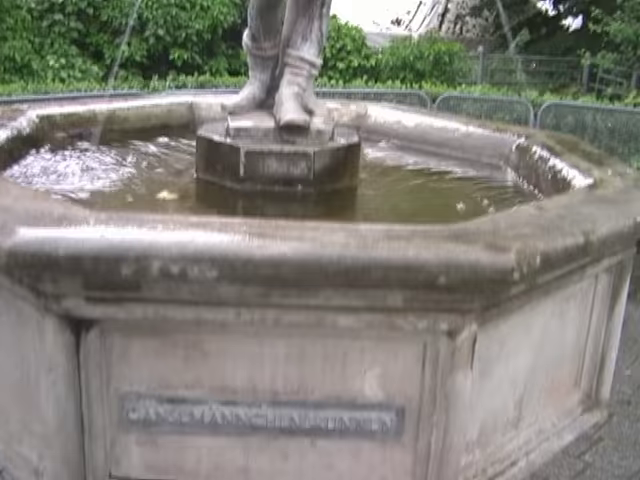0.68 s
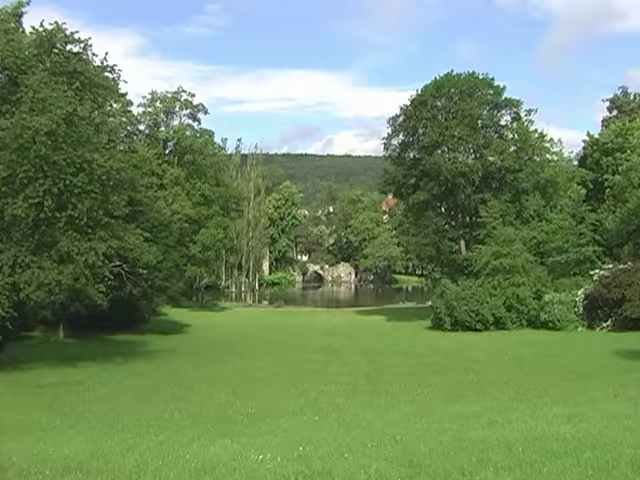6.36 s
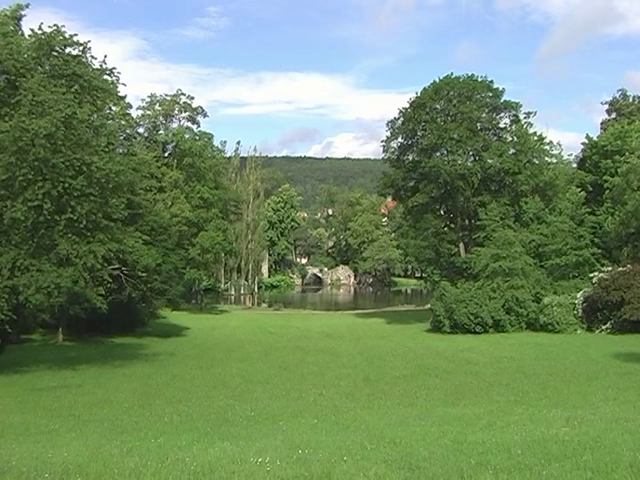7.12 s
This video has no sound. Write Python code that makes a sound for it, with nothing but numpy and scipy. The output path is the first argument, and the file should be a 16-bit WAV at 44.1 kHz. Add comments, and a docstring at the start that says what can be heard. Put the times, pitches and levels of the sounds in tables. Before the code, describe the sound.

Outdoors, close to a fountain basin, fine jets make crisp ticks, ringing bubble plinks and a few low glugs over a continuous rush. Early on a car comes by, its low engine and pulsing drone giving way to broad tyre noise, then recedes. A sudden cut leads to an open park, very soft, with far-off rushing, thin high bird notes and repeated chips turning into buzzes, with short woodland echo. Handheld stereo microphone.

```python
"""After a short silence, thin jets patter into the basin of a stone fountain: noise for the steady rush,
ringing tones and bursts of noise for the drops. A car passes behind: tyre noise, exhaust drone, engine tone.
Then a hard cut to a quiet park with far rushing, made of noise. A thin high warbler starts, then a finch
joins it: gliding sines that warble or buzz, with echoes from the trees as a dying tail of noise."""
import sys
import numpy as np
from scipy import signal
from scipy.io import wavfile

SR = 44100
rng = np.random.default_rng(int(sys.argv[2]) if len(sys.argv) > 2 else 0)


def persist_wave(psi):
    """Save psi, clipped to +-1, as 16-bit WAV."""
    counts = np.round(np.clip(psi, -1, 1) * 32767).astype(np.int16)
    wavfile.write(sys.argv[1], SR, np.atleast_2d(counts).T)


def invert_db(level):
    """Linear amplitude ratio for a level in decibels (20 dB per decade), elementwise."""
    return 10 ** (np.asarray(level, dtype=float) / 20)


N = 357210

# stay at the fountain: (first moment [s], last moment [s])
FOUNTAIN_S = (.7575, 6.438)


def rms_one(x):
    """Scales a signal to unit power."""
    return x / np.sqrt(np.mean(x ** 2) + 1e-20)


def in_time(rows):
    """Turns table rows into one curve per column, sample by sample."""
    s, *columns = np.transpose(rows)
    return [np.interp(np.arange(N) / SR, s, c) for c in columns]


def at_hz(points, hz):
    """Reads a table at a frequency, along a logarithmic frequency axis."""
    points = np.array(points)
    return np.interp(np.log(hz), np.log(points[:, 0]), points[:, 1])


def sides(left_right_db):
    """Gains of the two channels for a left-right level difference."""
    return invert_db(np.multiply.outer([.5, -.5], left_right_db))


def drift(rate_hz):
    """Slow random curve of unit power: noise smoothed by two equal poles, computed every 40 samples."""
    r = np.exp(-2 * np.pi * rate_hz * 40 / SR)
    white = rng.standard_normal(N // 40 + 2002)
    slow = signal.lfilter([1], [1, -2 * r, r * r], white)[2000:]   # skip the start-up
    return np.interp(np.arange(N) / 40, np.arange(len(slow)), rms_one(slow))


def bandpass(low_high_hz, x):
    """Keeps only the sound between two frequencies."""
    return signal.sosfilt(signal.butter(2, low_high_hz, "band", fs=SR, output="sos"), x)


def banded_noise(spectrum, likeness, balance, patchy_db, shape_db=lambda hz: 0):
    """Third-octave bands of stereo noise, each with its own level, flicker and left-right likeness."""
    out, power = 0, 0
    edges = 28 * 2 ** (np.arange(28) / 3)
    white = rng.standard_normal((2, 2, N))
    for k, (low, high) in enumerate(zip(edges, edges[1:])):
        mid, side = bandpass([low, high], white[k % 2])   # neighbours use separate noise
        hz = np.sqrt(low * high)
        alike = np.clip(at_hz(likeness, hz), -1, 1)
        gain = invert_db(at_hz(spectrum, hz))
        power += gain ** 2 * (high - low) * 4 / SR
        flicker = invert_db(patchy_db * drift(6.0) + shape_db(hz))
        gain = gain * flicker * sides(at_hz(balance, hz))[:, None]
        out = out + gain * (np.sqrt(1 + alike) * mid + np.sqrt(1 - alike) * side * [[1], [-1]])
    return out / np.sqrt(power)


def scatter(s, shapes):
    """Adds each stereo shape (2, events, samples) at its moment."""
    start = np.round(s * SR).astype(int)[:, None]
    at = np.minimum(start + np.arange(shapes.shape[2]), N).ravel()
    return np.array([np.bincount(at, side.ravel(), N + 1)[:N] for side in shapes])


def bubbles(s, db, hz, pan_db, lag_s, cycles, rise, size):
    """Each bubble swells within a cycle, rings some cycles and climbs in pitch as it nears the surface."""
    late_s = np.multiply.outer([0, 1], lag_s)[..., None] - np.minimum(lag_s, 0)[:, None]
    turns = np.maximum(np.arange(size) / SR - late_s, 0) * hz[:, None]
    swell_and_decay = (1 - np.exp(-turns / 0.4)) * np.exp(-turns / cycles[:, None])
    shape = swell_and_decay * np.sin(2 * np.pi * turns * (1 + rise * turns))
    return scatter(s, 1.5 * shape * (invert_db(db) * sides(pan_db))[..., None])


# bands of an impact: (from [Hz], to [Hz])
CRACK_BANDS_HZ = [(2800, 6500), (5000, 9500), (8000, 12500)]
# greatest share of an impact in each of these bands: (level [dB])
CRACK_BANDS_DB = [1, -1, -4.5]
CRACK_COLOUR_DB = 6.0   # how unevenly an impact fills the bands


def cracks(s, db, pan_db, decay_s):
    """A drop hits the surface: a bright noise burst with its own colour, mostly alike in both channels."""
    noise = rng.standard_normal((len(s), 3, 128)).transpose(1, 0, 2)
    decay = np.exp(-np.arange(128) / SR / decay_s)
    burst = (noise[0] + 0.73 * noise[1:]) * decay * sides(pan_db)[..., None]
    colour_db = CRACK_COLOUR_DB * rng.standard_normal((len(s), 3))
    colour_db = colour_db - colour_db.max(axis=1, keepdims=True) + CRACK_BANDS_DB
    out = 0
    for band, share_db in zip(CRACK_BANDS_HZ, colour_db.T):
        out = out + bandpass(band, scatter(s, burst * invert_db(db + share_db)[:, None]))
    return out


# loudest drops: (time [s], bubble level [dB], bubble pitch [Hz], impact level [dB])
DROPS = [(0.765, -27, 3500, -25.5), (0.821, -20, 3020, -28), (0.903, -31, 3700, -24),
         (0.9717, -16, 3470, -27), (1.1237, -22, 3600, -23), (1.1768, -22, 7960, -28),
         (1.2066, -28, 2930, -26), (1.224, -18, 3830, -19), (1.267, -22, 3200, -24),
         (1.357, -22, 3580, -31), (1.4067, -19.5, 3550, -24), (1.4686, -34, 2905, -22),
         (1.526, -21.5, 3320, -33), (1.622, -27, 3740, -28), (1.714, -19, 3710, -24.5),
         (1.9312, -16, 3500, -27), (2.1055, -13.5, 4200, -25), (2.1288, -20.5, 4240, -34),
         (2.1602, -17, 3720, -33), (2.352, -24.5, 3730, -29), (2.417, -17, 3740, -30),
         (2.607, -21.5, 3720, -24), (2.645, -15, 5160, -32), (2.6608, -8, 3786, -27.5),
         (2.69, -15, 3640, -32), (2.971, -13.5, 3140, -24), (3.027, -30, 6200, -32),
         (3.095, -15.5, 5840, -22), (3.3789, -17, 2800, -31), (3.5325, -9.5, 5300, -35),
         (3.6202, -12, 3200, -37), (3.8757, -18, 3030, -36), (4.0346, -16, 3950, -36),
         (4.219, -14, 5600, -27), (4.2404, -21, 4400, -27), (4.2875, -15, 4680, -34),
         (4.476, -19.5, 3870, -30), (4.5196, -17.5, 3060, -20), (4.566, -18, 4700, -26),
         (4.633, -18, 3840, -39), (4.763, -20.5, 3750, -38), (4.867, -33, 4000, -23),
         (5.0442, -16, 5430, -35), (5.084, -21.5, 5600, -27), (5.116, -21.5, 3870, -32),
         (5.1994, -19.5, 3840, -38), (5.218, -35, 3420, -16), (5.303, -27, 5280, -31),
         (5.493, -15.5, 4200, -28), (5.545, -19, 4670, -45), (5.6324, -18.5, 4620, -41),
         (5.6788, -24, 3770, -36), (5.743, -18, 5440, -42), (5.772, -17, 6360, -35),
         (5.9078, -23, 2800, -20), (6.033, -14.5, 4240, -40), (6.089, -19.5, 5680, -32),
         (6.098, -21, 4360, -27), (6.1633, -16.5, 5340, -32), (6.21, -22, 4380, -22),
         (6.2658, -21, 5250, -30), (6.298, -19, 5270, -35), (6.3462, -28, 3840, -26),
         (6.4255, -20, 5660, -29)]
DROPS_LEFT_DB, DROPS_SPREAD_DB = 1.3, 4   # where they land: mean and range of left-right level


def loudest_drops():
    """Each loud drop cracks on the surface and traps a bubble that rings for two or three cycles."""
    s, db, hz, crack_db = np.transpose(DROPS)
    lag, ring, place = rng.random((len(s), 3)).T
    pan_db = DROPS_LEFT_DB + DROPS_SPREAD_DB * (place - .5)
    rings = bubbles(s, db, hz, pan_db, 4e-5 * (lag - .3), 2.0 + 1.0 * ring, rise=0.0044, size=640)
    return rings + cracks(s, crack_db, pan_db, decay_s=0.0016)


# left-right likeness near by: (frequency [Hz], likeness [-1 to 1])
NEAR_LIKENESS = [(60, 1), (300, 0.99), (1360, 0.98), (3000, .9), (6500, 0.45), (10000, 0.22), (14000, 0.33)]
# left-right balance near by: (frequency [Hz], left over right [dB])
NEAR_BALANCE = [(60, 4), (110, 1), (200, 2.5), (370, 1.5), (680, 2), (1250, 3), (2290, 1.5), (4200, 3),
                (7700, -3), (14100, 5)]
# colour of the patter: (frequency [Hz], relative level per Hz [dB])
PATTER = [(1500, 7), (2500, -7), (4000, -2), (6000, -4.5), (9000, -21), (13500, -31.5)]
# strength of the patter above 6 kHz as the jets waver: (time [s], level [dB])
SPRAY = [(.75, -47.5), (1.3, -46.5), (2, -45.5), (2.6, -47), (3.1, -44), (3.7, -44), (4.3, -47.5),
         (5, -47.5), (5.7, -46), (6.44, -47.5)]


def patter(count):
    """Countless small drops, coming in clumps, most faint and a few loud; each rings, one in five cracks."""
    first, last = (np.array(FOUNTAIN_S) * SR).astype(int)
    density = np.cumsum(invert_db(3.5 * drift(30))[first:last])
    when, pitch, size, pan, lag, ring, force = rng.random((count, 7)).T
    s = (first + np.searchsorted(density, when * density[-1])) / SR
    hz = 1600 * 8.4 ** pitch
    db = at_hz(PATTER, hz) + 20 * np.log10(hz) - 4 * np.log(np.maximum(size, .01))
    pan_db = at_hz(NEAR_BALANCE, hz) + 3 * (pan - .5)
    rings = bubbles(s, db, hz, pan_db, 6e-5 * (lag - .5), 1.5 + 4.5 * ring, rise=.002, size=256)
    tick_db = -4.5 * np.log(np.maximum(force[::5], .02))
    ticks = cracks(s[::5], tick_db, pan_db[::5], decay_s=0.00067)
    drops = rms_one(rings) + invert_db(-7.5) * rms_one(ticks)
    highpass = signal.butter(4, 6000, "high", fs=SR, output="sos")
    treble = signal.sosfilt(highpass, drops[:, first:last])
    return invert_db(in_time(SPRAY)[0]) * drops / treble.std()


# low tones: bubbles, and a short low plop at 2.97 s that may be the engine:
# (time [s], level [dB], pitch [Hz])
LOW_TONES = [(1.194, -29, 457), (2.974, -28, 249), (3.548, -21.5, 483), (4.609, -24.5, 534),
             (4.652, -26, 657), (4.96, -30, 672), (5.082, -27, 706), (5.365, -29, 490), (5.505, -32, 657),
             (5.582, -29, 720), (5.684, -33, 460), (5.748, -31, 703), (5.812, -25.5, 660),
             (6.149, -34, 634)]


def low_tones():
    """Low tones that swell, ring and climb as bubbles do, a little to the left; one may be the engine."""
    s, db, hz = np.transpose(LOW_TONES)
    steady = np.ones(len(s))
    return bubbles(s, db, hz, 2.6 * steady, 0 * steady, 5.5 * steady, rise=.006, size=3200)


def glugs(count):
    """Many fainter big bubbles under the jets ring at random moments."""
    when, pitch, size = rng.random((count, 3)).T
    s = np.interp(when, [0, 1], FOUNTAIN_S)
    steady = np.ones(count)
    hz = 420 * 3.5 ** pitch
    return bubbles(s, -31 - 8 * size, hz, 3.8 * steady, 0 * steady, 6 * steady, rise=0.0035, size=2400)


# colour of the jets' rush: (frequency [Hz], relative level per Hz [dB])
RUSH = [(25, -10), (60, -3.5), (150, -12), (280, 9), (500, -13), (1000, -4), (1600, 3.5), (2500, -2),
        (4000, -22), (6500, -44), (10000, -23), (14000, -42)]
RUSH_DB = -38.5   # rms level


def jet_rush():
    """The jets blur into a steady noise."""
    return invert_db(RUSH_DB) * banded_noise(RUSH, NEAR_LIKENESS, NEAR_BALANCE, patchy_db=0.0)


def fountain():
    """The basin: steady rush, random patter and glugs, the loudest drops, and the low tones."""
    return jet_rush() + patter(count=9000) + loudest_drops() + low_tones() + glugs(count=160)


# colour of the tyre roar: (frequency [Hz], relative level per Hz [dB])
TYRES = [(25, -26), (60, -9.5), (165, -5.5), (250, 0), (330, 5.5), (400, -1), (520, 1.5), (800, 1),
         (1200, 0), (1700, -1), (2900, -8.5), (5000, -13), (8000, -28), (14000, -31.5)]
# moment [s] and level [dB] when nearest; time [s] to cover the nearest distance, coming and going
PASS_S, PASS_DB, COMING_S, GOING_S = 2.87, -24, 0.77, 1
# the open view of the tyres comes later: moment and half width [s], added tilt and tread hiss
IN_VIEW_S, IN_VIEW_HALF_S, BRIGHTEN_DB_PER_OCTAVE, TREAD_DB = 3.85, 0.66, 1.14, 7.5
HIDDEN_DB_PER_OCTAVE, HIDDEN_TREAD_DB = -0.25, -3.5   # tilt and tread hiss out of view
TREAD_HZ, TREAD_OCTAVES = 2800, 1   # centre and half width of the tread hiss


def tyres(t):
    """Tyre roar falls off with distance on a straight road, and brightens in open view."""
    distance = np.hypot(1, (t - PASS_S) / np.where(t < PASS_S, COMING_S, GOING_S))
    view = np.exp(-((t - IN_VIEW_S) / IN_VIEW_HALF_S) ** 2)
    tilt_db = HIDDEN_DB_PER_OCTAVE + BRIGHTEN_DB_PER_OCTAVE * view ** 0.28
    tread_db = HIDDEN_TREAD_DB + TREAD_DB * view

    def brighten(hz):
        """Level change of a band through time: tilt around 800 Hz plus a hump of tread hiss."""
        hump = np.exp(-(np.log2(hz / TREAD_HZ) / TREAD_OCTAVES) ** 2)
        return tilt_db * np.clip(np.log2(hz / 800), -2, 4) + tread_db * hump

    roar = banded_noise(TYRES, NEAR_LIKENESS, NEAR_BALANCE, patchy_db=.8, shape_db=brighten)
    return invert_db(PASS_DB) / distance * roar


# exhaust drone at the top of its throbs: (time [s], level [dB])
BOOM = [(.75, -44), (1.45, -38), (1.6, -33), (2.25, -31), (2.55, -32.5), (2.7, -52), (3.2, -70)]
BOOM_HZ, SWAY_HZ = 319, 13   # mean pitch and its sway
THROB_S, THROB_TOP_S, THROB_DB = .2, 2.01, 4.5   # period, moment of a top, half the range


def exhaust(t):
    """A drone that throbs, its pitch swaying with every throb."""
    turn = 2 * np.pi * (t - THROB_TOP_S) / THROB_S
    hz = BOOM_HZ + SWAY_HZ * np.cos(turn) + 2.8 * drift(7.3)
    phase = 2 * np.pi * np.cumsum(hz) / SR
    db = in_time(BOOM)[0] + THROB_DB * (np.cos(turn) - 1) + 1.5 * drift(14)
    return np.sqrt(2) * invert_db(db) * np.sin(phase)


# pulls on the throttle: (time [s], length [s], from firing rate [Hz], to firing rate [Hz], level [dB])
ENGINE = [(.7, 0.85, 43.5, 45.1, -47), (1.88, 1, 48.9, 49.4, -46.5), (2.86, 0.94, 58.9, 58.3, -57),
          (3.71, .28, 47, 44.7, -55)]
THROTTLE_EDGE_S, OCTAVE_SHARE = .07, 0.47


def engine(t):
    """The low firing tone with a share of its octave, heard while the throttle is open."""
    out = 0
    for s, length_s, from_hz, to_hz, db in ENGINE:
        hz = np.interp(t, [s, s + length_s], [from_hz, to_hz])
        phase = 2 * np.pi * np.cumsum(hz) / SR
        throttle = np.clip(np.minimum(t - s, s + length_s - t) / THROTTLE_EDGE_S, 0, 1)
        tone = np.sin(phase) + OCTAVE_SHARE * np.sin(2 * phase)
        out = out + np.sqrt(2) * invert_db(db + 1.2 * drift(6)) * throttle * tone
    return out


def car():
    """A passing car: tyre roar, with exhaust drone and firing tone a little to the left."""
    t = np.arange(N) / SR
    return tyres(t) + sides(3.7)[:, None] * (exhaust(t) + engine(t))


def add(track, s, hz, db, throb=1):
    """Adds a sine on the pitch curve hz, faded in and out."""
    i = round(s * SR)
    fade = signal.windows.tukey(len(hz), .5) * throb
    tone = np.sqrt(2) * invert_db(db) * fade * np.sin(2 * np.pi * np.cumsum(hz) / SR)
    track[i:i + len(hz)] += tone[:N - i]


# parts of the finch's three syllables:
# (delay [s], length [s], from pitch [Hz], to pitch [Hz], relative level [dB], buzz width [Hz])
CHIP = [(-.004, .018, 5700, 5480, -2, 30), (.007, 0.013, 5360, 4030, 5, 20),
        (.018, .022, 4120, 4030, -2, 40), (.05, 0.02, 4120, 3980, 1, 40)]
BUZZ = [(-.017, 0.0147, 5000, 4630, -6, 40), (0, 0.0123, 3500, 4560, 2, 150),
        (.01, 0.0118, 4400, 5170, 0, 250), (.006, .09, 4150, 3920, -2, 170),
        (.025, .06, 3554, 3430, -7.5, 204), (.062, .03, 5500, 6900, -14, 303),
        (.08, .1, 6130, 5710, -12, 450), (.09, 0.022, 6000, 4930, -3.5, 150)]
FLOURISH = [(-.03, 0.033, 4300, 4490, -5, 400), (0, .022, 3810, 2700, 1, 60),
            (.012, .014, 2900, 2000, -12, 60)]
# the song repeats each syllable, swelling:
# (parts, repeats, first time [s], period [s], first level [dB], swell per repeat [dB])
SONG = [(CHIP, range(4), 6.696, .139, -68.5, 3.4), (BUZZ, range(4), 7.224, .188, -53, 1.5),
        (FLOURISH, range(2), 7.988, .076, -46.5, .5)]


def finch():
    """Every syllable replays its parts; a fast uneven flutter of pitch and loudness makes the buzz."""
    out = np.zeros(N)
    flutter = rms_one(bandpass([120, 260], rng.standard_normal(N)))
    for parts, repeats, first_s, period_s, first_db, swell_db in SONG:
        for k in repeats:
            s, db = first_s + k * period_s, first_db + k * swell_db
            for delay_s, length_s, from_hz, to_hz, part_db, buzz_hz in parts:
                size = round(length_s * SR)
                glide = np.geomspace(from_hz, to_hz, size)
                # pitch and loudness use separate stretches of the flutter
                i = round(s * SR) - size
                hz = glide + buzz_hz * np.tanh(flutter[i:i + size])
                add(out, s + delay_s, hz, db + part_db, throb=1 + .3 * flutter[i - size:i])
    return out


# the warbler's notes: (time [s], length [s], from pitch [Hz], to pitch [Hz], level [dB])
WARBLER = [(6.59, .05, 7850, 7400, -67), (6.66, .11, 7400, 7360, -69), (6.692, .03, 6250, 6500, -67),
           (6.747, 0.095, 6400, 6900, -70), (6.858, 0.16, 6500, 6950, -67), (7.104, 0.043, 7300, 7800, -64),
           (7.33, 0.23, 7540, 7460, -70), (7.785, .04, 7100, 7840, -64), (7.855, .02, 7200, 6900, -66),
           (7.9, 0.071, 7560, 7400, -56.5), (7.958, .145, 7100, 7250, -65)]
# the warble widens towards the end: (time [s], pitch swing [Hz])
WARBLE_DEPTH = [(6.6, 50), (7.8, 80), (7.9, 140), (7.96, 350)]
WARBLE_HZ, WARBLE_TOP_S = 32, 7.975   # swings per second, moment of a top
THROB_PER_S = 2.5   # longer notes throb more


def warbler():
    """Thin glides with a steady warble, louder at the top of each swing."""
    out = np.zeros(N)
    for s, length_s, from_hz, to_hz, db in WARBLER:
        glide = np.geomspace(from_hz, to_hz, round(length_s * SR))
        swing = np.cos(2 * np.pi * WARBLE_HZ * (s - WARBLE_TOP_S + np.arange(len(glide)) / SR))
        depth_hz = np.interp(s, *np.transpose(WARBLE_DEPTH))
        add(out, s, glide + depth_hz * swing, db, 1 + min(THROB_PER_S * length_s, 1) * swing)
    return out


TREES_T60_S, TREES_DB = .55, 2.5   # time to fade by 60 dB, level of the tail


def trees(x):
    """Trunks and leaves scatter back a dense dying tail, unrelated in the two channels."""
    t = np.arange(SR) / SR
    tail = rng.standard_normal((2, SR)) * invert_db(-60 * t / TREES_T60_S) * np.minimum(t / 0.0046, 1)
    tail = tail / np.sqrt(np.sum(tail ** 2) / 2)
    return invert_db(TREES_DB) * signal.fftconvolve(x[None], tail, axes=1)[:, :N]


def birds():
    """Both birds sing to the right among the echoing trees; the warbler sits nearer."""
    song, high = finch(), warbler()
    direct = sides(-5)[:, None] * song + sides(-2.5)[:, None] * high
    direct[0] = np.roll(direct[0], 2)   # the left port hears them two samples late
    return direct + trees(song + invert_db(-7) * high)


# colour of the far rushing: (frequency [Hz], relative level per Hz [dB])
PARK = [(18, -32), (30, -11), (54, 5), (112, -1.5), (292, -4), (341, -6), (516, -3), (602, -5),
        (1120, -3.5), (2770, -20), (3680, -22.5), (6670, -29.5), (7600, -39), (12700, -34), (14500, -53)]
PARK_DB = -47   # rms level
# left-right likeness far away: (frequency [Hz], likeness [-1 to 1])
FAR_LIKENESS = [(60, 0.97), (130, 1), (290, 0.84), (620, 0.77), (1360, 0.8), (2970, 0.4), (6480, 0.23),
                (14100, -0.074)]
# left-right balance far away: (frequency [Hz], left over right [dB])
FAR_BALANCE = [(60, 1.5), (110, 3.5), (200, -0.5), (370, 4), (680, 2.0), (1250, 2.5), (2290, 0.5),
               (4200, -4), (7700, 1), (14100, -1)]


def far_rushing():
    """A soft noise from far away whose bands flicker slightly."""
    return invert_db(PARK_DB) * banded_noise(PARK, FAR_LIKENESS, FAR_BALANCE, patchy_db=1.0)


def park():
    """The two birds above the far rushing."""
    return birds() + far_rushing()


# resonances of the microphone capsules: (frequency [Hz], width [Hz], gain [dB])
MICROPHONE = [(3750, 210, 1.5), (5600, 510, 0.5), (7100, 900, -2.5), (8520, 2150, 5), (10300, 510, 2),
              (11750, 920, 0.5)]
PORT_HZ, PORT_WIDTH_HZ = 10260, 980   # phase turn between the ports
NOTCH_STEP_HZ = 300


def camera(x):
    """Capsule resonances, a phase turn between the ports, notches against the camera motor's whine."""
    for hz, width_hz, db in MICROPHONE:
        x = x + (invert_db(db) - 1) * signal.lfilter(*signal.iirpeak(hz, hz / width_hz, SR), x)
    # the right port turns the treble through a full cycle against the left
    r = np.exp(-np.pi * PORT_WIDTH_HZ / SR)
    port = [1, -2 * r * np.cos(2 * np.pi * PORT_HZ / SR), r * r]
    x = np.array([x[0], signal.lfilter(port[::-1], port, x[1])])
    for k in range(1, 19):   # notches get shallower upwards
        turn = -2 * np.cos(2 * np.pi * k * NOTCH_STEP_HZ / SR)
        pole = np.exp(-np.pi * 26 / SR)
        zero = np.exp(-np.pi * (4 + 0.068 * k) / SR)
        x = signal.lfilter([1, turn * zero, zero ** 2], [1, turn * pole, pole ** 2], x)
    return x


def scene():
    """Silence, the fountain with the car, a hard cut, the park; each place is filtered on its own."""
    t = np.arange(N) / SR
    first, last = FOUNTAIN_S
    at_fountain = (t >= first) & (t < last)
    return camera(fountain() + car()) * at_fountain + camera(park()) * (t >= last)


def band_limit(x):
    """A steep low-pass at the top of the band."""
    return signal.sosfilt(signal.butter(12, 14730, fs=SR, output="sos"), x)


def record(dry):
    """A steep low-pass cuts the top."""
    lowpass = signal.butter(16, 13400, fs=SR, output="sos")
    mix = signal.sosfilt(lowpass, dry)
    return band_limit(mix)


dry = scene()
out = record(dry)
persist_wave(out)
```